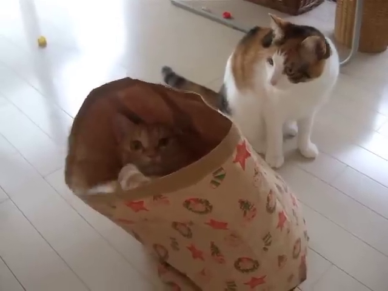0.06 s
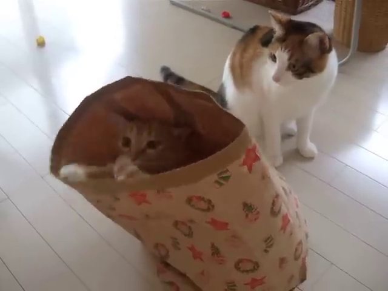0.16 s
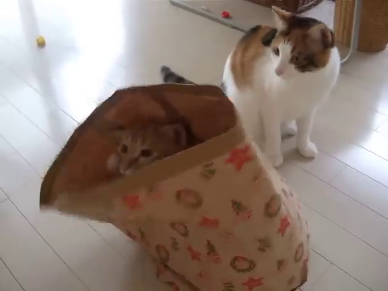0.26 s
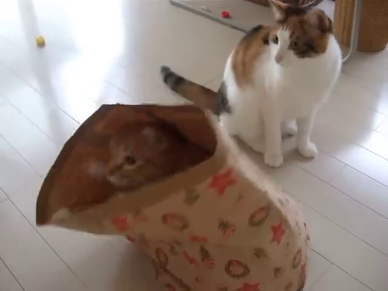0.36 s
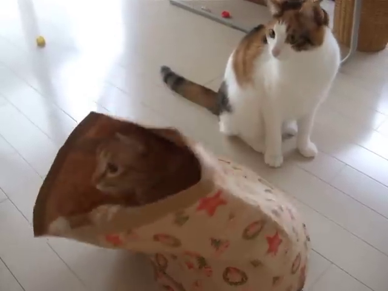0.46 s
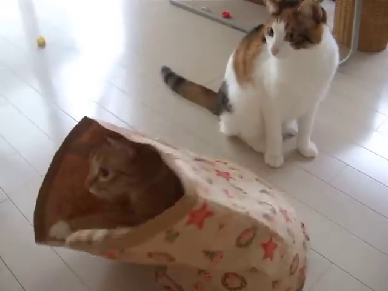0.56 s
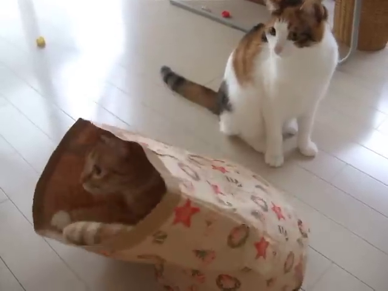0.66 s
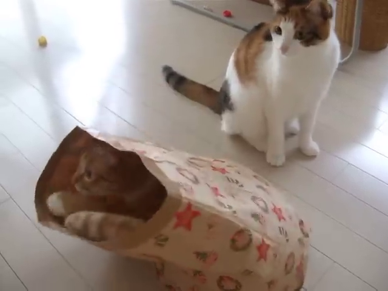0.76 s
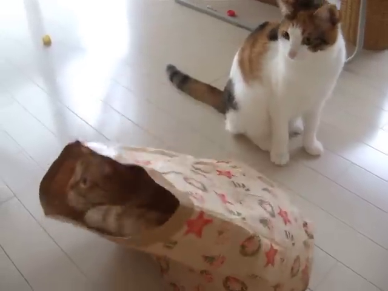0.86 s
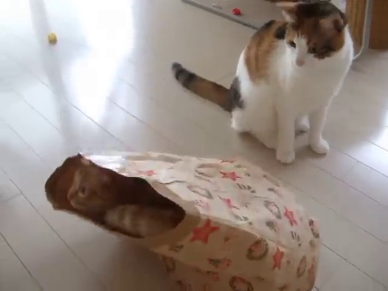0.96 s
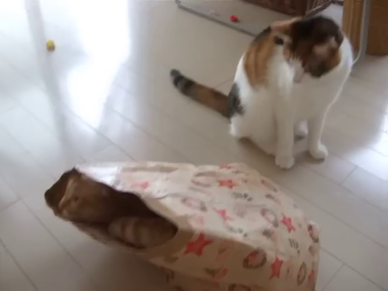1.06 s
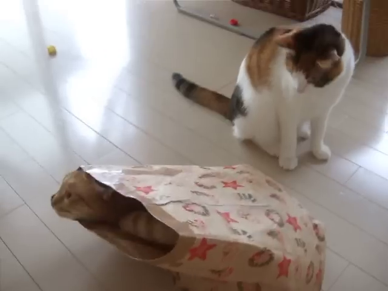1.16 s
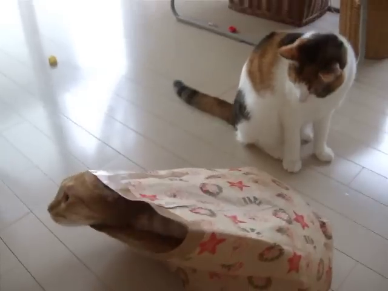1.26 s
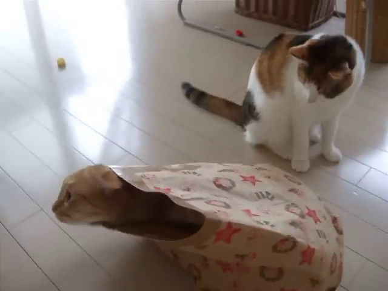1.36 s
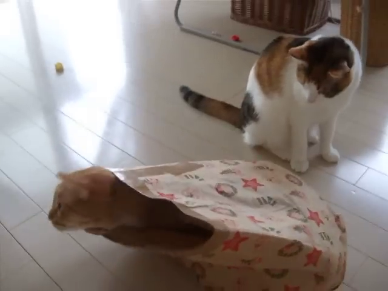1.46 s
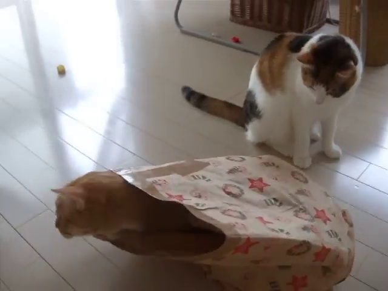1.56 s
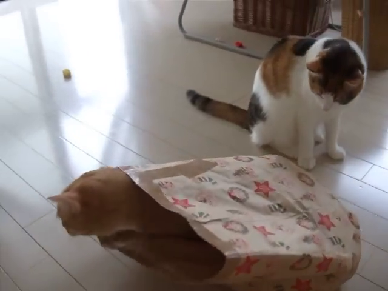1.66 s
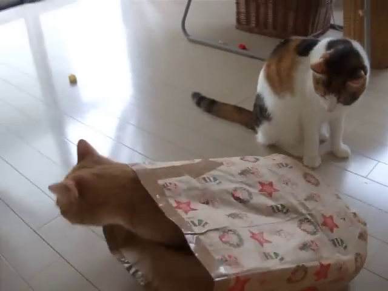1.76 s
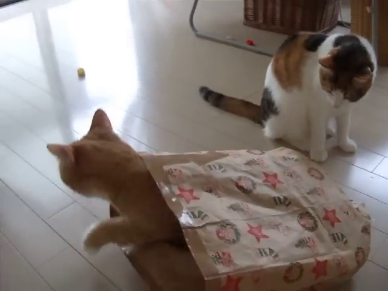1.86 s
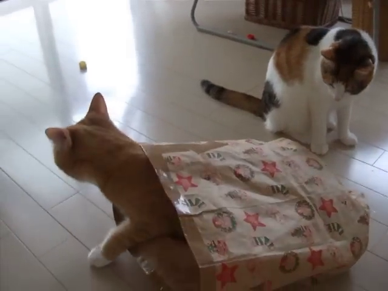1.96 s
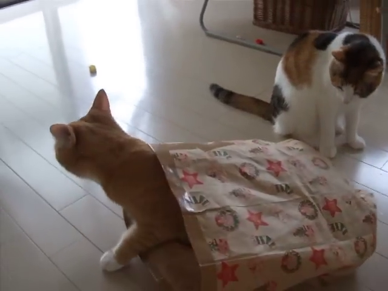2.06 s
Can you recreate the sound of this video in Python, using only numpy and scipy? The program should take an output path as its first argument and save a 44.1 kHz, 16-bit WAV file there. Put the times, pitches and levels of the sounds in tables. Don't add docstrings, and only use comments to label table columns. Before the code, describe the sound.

Paper bag rustling: brief near-quiet, then a sudden burst of hard crackles, sparser crumpling, and a second dense flurry as the cat climbs out onto a hard floor; short dull room echo, faint microphone hiss.

```python
import sys
import numpy as np
from scipy import signal
from scipy.fft import rfft, irfft
from scipy.io import wavfile

SR = 44100
rng = np.random.default_rng(int(sys.argv[2]) if len(sys.argv) > 2 else 0)


def elevation(decibels):
    levels = np.asarray(decibels, float)
    return 10 ** (levels / 20)


def pcm_store(signal):
    levels = np.round(np.clip(np.atleast_2d(signal), -1, 1) * 32767)
    wavfile.write(sys.argv[1], SR, levels.astype(np.int16).T)


N = 94815

# (frequency [Hz], level [dB per Hz])
HUSH_COLOUR = [(30, -13), (100, -8), (230, -9), (500, -14.5), (1250, -28), (8000, -11)]
# (frequency [Hz], level [dB per Hz])
SLIDE_COLOUR = [(1200, -12.5), (3000, -8), (7000, -3.5), (9000, 0)]
# (frequency [Hz], level [dB per Hz])
PAPER_COLOUR = [(160, -36.5), (400, -14), (850, 0.5), (1400, -9.5), (2500, -8), (4000, -17.5)]
# (time [s], wrinkling level [dB], sliding level [dB])
CAT_MOTION = [(0, -59, -75), (.065, -61.5, -85), (.08, -52, -42), (.2, -53, -40), (0.258, -37.5, -43.5),
              (0.451, -47, -37.5), (.6, -42.5, -43), (.78, -51, -37), (.9, -56, -42.5), (0.989, -49, -40.5),
              (1.09, -47, -40.5), (1.24, -39, -42), (1.38, -48, -34.5), (1.52, -48.5, -32),
              (1.721, -39.5, -44.5), (1.86, -43, -42), (2.0, -53, -48.5), (2.15, -53.5, -45.5)]
# (time [s], peak [dB], pitch [Hz])
FLOOR_THUDS = [(0.116, -54, 280), (0.286, -33, 290), (0.33, -27.5, 272), (0.421, -45, 298),
               (0.735, -43.5, 203), (1.187, -38, 380), (1.227, -29, 324), (1.628, -35.5, 283),
               (1.686, -29, 286), (1.73, -63.5, 312), (2.131, -42.5, 295), (0.25, -45, 112),
               (0.285, -41.5, 91), (0.408, -35, 338), (1.35, -50, 162), (1.73, -40.5, 120), (1.79, -43, 90),
               (1.815, -35, 320)]
# (time [s], peak [dB], pitch [Hz])
PANEL_POPS = [(0.143, -27, 770), (0.193, -28.5, 830), (0.221, -25.5, 880), (0.232, -20, 780),
              (0.247, -19, 770), (0.259, -20.5, 734), (0.288, -17, 785), (0.327, -12, 945),
              (0.365, -23.5, 618), (0.418, -26, 950), (0.434, -24.5, 960), (0.4475, -19.5, 990),
              (0.481, -21, 800), (0.506, -19.5, 880), (0.53, -43, 810), (0.548, -18, 894),
              (0.616, -26, 784), (0.658, -21.5, 970), (0.782, -26, 900), (0.929, -17, 800),
              (0.996, -19, 883), (1.029, -19.5, 884),
              (1.104, -16.5, 1015), (1.179, -17.5, 730), (1.187, -22, 690), (1.195, -11.5, 935),
                 (1.214, -18, 730), (1.2425, -13.5, 980), (1.259, -19, 870), (1.302, -12, 810),
                 (1.316, -17.5, 1040), (1.383, -22.5, 820), (1.392, -21, 1215), (1.478, -22, 890),
                 (1.497, -17, 1130), (1.562, -18, 1026), (1.583, -17, 900), (1.627, -18, 923),
                 (1.684, -13, 1010), (1.726, -23, 408), (1.81, -17.5, 1020), (1.818, -15, 940),
                 (1.847, -16, 1010), (1.969, -22, 960),
              (0.118, -36, 1094), (0.251, -15, 800), (.266, -25, 790), (.298, -17, 800),
                 (.331, -16.5, 780), (.341, -22.5, 950), (.459, -19.5, 980), (.535, -22, 805),
                 (.565, -33, 770), (0.684, -25.5, 945), (.7, -23.5, 1010), (.843, -24, 796),
                 (.912, -26.5, 904), (1.002, -20, 896), (1.009, -39, 900), (1.019, -32, 905),
                 (1.042, -32.5, 580), (1.108, -16, 940), (1.123, -19.5, 965), (1.251, -26.5, 397),
                 (1.231, -20.5, 940), (1.246, -16.5, 970), (1.267, -18.5, 830), (1.271, -30.5, 760),
                 (1.457, -37, 860), (1.598, -17, 905), (1.612, -27, 854), (1.688, -14, 864),
                 (1.696, -25, 980), (1.704, -21, 900), (1.738, -21.5, 815), (1.752, -21.5, 900),
                 (1.791, -20.5, 1020), (1.826, -35, 1000)]
# (time [s], peak [dB], low part [dB],
# high part [dB], fade [ms])
CREASE_SNAPS = [(0.0704, -38, -4.5, 3, 0.75), (0.219, -21, -18, -12.5, 6),
                (0.2338, -14.5, -14.5, -25, 7.7), (0.2476, -2.5, -8.5, -6, 1.07),
                (0.2564, -36, -21, -15.5, 1.2), (0.2834, 3.5, -25, -16, 2), (0.2936, -8.5, -25, -2, 2.3),
                (0.2959, -10, -19, -16, 1.4), (0.3249, -23.5, -1.5, -40.5, 3.8),
                (0.4164, -31, -5.5, -32, 1), (0.4594, -35, 1, -7, 1.1), (0.4816, -7, -15, -6, 1.9),
                (0.5209, -20, -3.5, 6.5, 1.6), (0.5464, -22.5, -9.5, -27, 4.6),
                (0.6203, -41.5, 10, 4, 0.88), (0.6571, -8.5, -19.5, -12, 1.76),
                (0.7001, -7, -23, -17, 2.8), (0.7274, -35, -5, -16, 0.67),
                (0.8425, -13.5, -11.5, -6.5, 2.6), (0.9084, -34.5, 5.5, -44, 2.5),
                (0.999, -8, -20.5, -9.5, 3.4),
                (1.1005, -34.5, -14, 6, 0.85), (1.1208, -13.5, -12.5, -11.5, 2),
                  (1.1782, -34, 7, -16, 2.7), (1.1827, -36.5, -13, 18, 0.83), (1.1889, -22, -7, 4, 2.5),
                  (1.217, -17.5, -22, -5, 1.9), (1.23, -19, -4, -5.5, 2.7), (1.2436, -14, -12.5, -2.5, 2.2),
                  (1.2603, -8, -17.5, -12.5, 2.3), (1.301, -18.5, -7.5, -28, 1.7),
                  (1.3164, -20, -3.5, 4.5, 1.4), (1.513, -24.5, -1, -25, 1.3),
                  (1.5615, -11, -38, -13.5, 3.9), (1.575, -23.5, -9, -27, 0.67), (1.5844, -24, 2, -25, 1.9),
                  (1.5966, 1, -29.5, -13, 1.2), (1.6277, -10, -7, -10.5, 1.7), (1.685, -18.5, 0.5, 6, 1.4),
                  (1.704, -12, -9, -12.5, 2), (1.7498, -12, -23.5, -28, 2.3),
                  (1.7787, -10.5, -20, -19.5, 4.2), (1.8088, -3, -34, -14.5, 2.2),
                  (1.8472, -21.5, 0, 5, 1.6), (1.9685, -25.5, -8.5, -5.5, 4.3),
                (0.5062, -23, -26, -4, 1.7),
    (0.5293, -29.5, -6, 0, 1.7),
    (1.6334, -34, -29, -25, 1.3),
    (1.816, -22, -2.5, -7, 0.64),
    (1.9376, -30, -13, -23, 2.3),
                (.252, -15, -15, -15, 1.6), (0.2584, -34, -20, -24.5, 3), (.275, -37, -17, -19, 3),
               (.307, -37, -30, -16, 2), (.353, -26, -8, -30, 2), (0.537, -20, -12, -16.5, 1.6),
               (1.107, -34, -13.5, -26, 2), (1.194, -27, -8.5, -28, 1.2), (1.66, -37, -14, -26, 1),
               (1.691, -19, -13, -30.5, 2.2), (1.718, -24.5, -22, -10, 1), (1.803, -26, -19, -18, 1),
               (1.818, -23, -3, -29, 1.5)]

HUSH_DB = -44.5
ROOM_T60_S, ROOM_DB, WALL_CUT_HZ = 0.26, -11, 4940
SLIDE_DB, SLIDE_FLICKER_DB = 2.5, 1.0
THUD_CYCLES, THUD_GAIN_DB, FLOOR_LOWEST_HZ = 10.5, 0.5, 55
WRINKLES_PER_S, WRINKLE_SPREAD_DB, CLUMP_DB = 2200, 1.5, 4.5
WRINKLE_CYCLES, WRINKLE_DB = 13.1, 3
POP_CYCLES, POP_GAIN_DB = 9.5, -3.5
FLUTTER_DB, FLUTTER_GRIT_DB, FLUTTER_MS = -13.5, 3.5, 3.57
SNAP_RISE_MS, SNAP_GRIT_DB, MID_PART_DB, SNAP_GAIN_DB = 0.28, 5, -16, 9
FLIP_AT_MS, FLIP_DB = 1.1, 9
BAG_LOWEST_HZ = 273


def rms_one(x):
    return x / np.sqrt(np.mean(x ** 2) + 1e-20)


def at_hz(points, hz):
    point_hz, point_db = np.transpose(points)
    return np.interp(np.log(hz), np.log(point_hz), point_db)


def drift(rate_hz):
    r = np.exp(-2 * np.pi * rate_hz / SR)
    wander = signal.lfilter([1], [1, -2 * r, r * r], rng.standard_normal(N + SR))
    return rms_one(wander[SR:])


def ring(clicks, hz, t60_s):
    r = elevation(-60 / (t60_s * SR))
    w = 2 * np.pi * hz / SR
    return signal.lfilter([0, np.sin(w)], [1, -2 * r * np.cos(w), r * r], clicks + 1e-18)


def band(x, low_hz, high_hz):
    return signal.sosfilt(signal.butter(2, [low_hz, high_hz], "band", fs=SR, output="sos"), x)


def coloured(spectrum):
    hz = np.maximum(np.fft.rfftfreq(N, 1 / SR), 1)
    return rms_one(irfft(rfft(rng.standard_normal(N)) * elevation(at_hz(spectrum, hz)), N))


def add(out, s, sound):
    i = int(s * SR)
    out[i:i + len(sound)] += sound[:len(out) - i]


def hush():
    return elevation(HUSH_DB) * coloured(HUSH_COLOUR)


def room(x):
    t = np.arange(SR // 2) / SR
    dull = np.exp(-2 * np.pi * WALL_CUT_HZ / SR)
    tail = signal.lfilter([1], [1, -dull], rng.standard_normal(len(t)))
    tail *= elevation(-60 * t / ROOM_T60_S)
    tail *= np.clip(t / 0.0076 - 0.3, 0, 1)
    return elevation(ROOM_DB) * signal.fftconvolve(x, tail / np.sqrt(np.sum(tail ** 2)))[:N]


def sliding_paper(level_db):
    flicker_db = SLIDE_FLICKER_DB * drift(8.1)
    return elevation(level_db + SLIDE_DB + flicker_db) * coloured(SLIDE_COLOUR)


def knocks(rows, cycles, gain_db):
    out = np.zeros(N)
    ms = np.arange(4000) / SR * 1000
    for s, db, hz in rows:
        chance, grit = rng.standard_normal((2, len(ms)))
        width = int(SR / hz / 2)
        flutter = chance * elevation(FLUTTER_GRIT_DB * (grit + 1)) * np.exp(-ms / FLUTTER_MS)
        push = elevation(FLUTTER_DB) * np.sqrt(width) * flutter
        push[:width] += np.hanning(width) * np.sign(chance[0])
        soft_push = signal.lfilter([1], [1, -np.exp(-4 * np.pi * hz / SR)], push)
        body = ring(soft_push, hz, cycles / hz)
        add(out, s, elevation(db + gain_db) * body / np.abs(body).max())
    return out


def floor_thuds():
    return band(knocks(FLOOR_THUDS, THUD_CYCLES, THUD_GAIN_DB), FLOOR_LOWEST_HZ, 5000)


def wrinkles(level_db):
    sizes = elevation(WRINKLE_SPREAD_DB * np.minimum(rng.exponential(1, N), 3))
    sizes *= rng.choice([-1, 1], N)
    born = rng.random(N) < WRINKLES_PER_S * elevation(CLUMP_DB * drift(40)) / SR
    pitches = np.geomspace(160, 4000, 24)
    dealt = rng.integers(0, 24, N)
    rustle = np.zeros(N)
    for k, hz in enumerate(pitches):
        clicks = sizes * born * (dealt == k)
        rustle += elevation(at_hz(PAPER_COLOUR, hz)) * hz * ring(clicks, hz, WRINKLE_CYCLES / hz)
    return elevation(level_db + WRINKLE_DB) * rms_one(rustle)


def panel_pops():
    return knocks(PANEL_POPS, POP_CYCLES, POP_GAIN_DB)


def crease_snaps():
    out = np.zeros(N)
    ms = np.arange(1000) / SR * 1000
    rise = 1 - np.exp(-(ms / SNAP_RISE_MS) ** 2)
    for s, db, low_db, high_db, fade_ms in CREASE_SNAPS:
        slip, grit = rng.standard_normal((2, len(ms)))
        burst = slip * elevation(SNAP_GRIT_DB * grit) * rise * np.exp(-ms / fade_ms)
        burst[int(FLIP_AT_MS * SR / 1000)] += elevation(FLIP_DB) * np.sign(slip[0])
        # (signed share, level [dB], from [Hz], to [Hz])
        parts = ((0.89, low_db, 1270, 3210),
                 (-0.54, MID_PART_DB, 3060, 5460),
                 (0.83, high_db, 5740, 11440))
        for share, part_db, low_hz, high_hz in parts:
            part = band(burst, low_hz, high_hz)
            add(out, s, elevation(db + part_db + SNAP_GAIN_DB) * share * part / np.abs(part).max())
    return out


def scene():
    s, wrinkle_db, slide_db = np.transpose(CAT_MOTION)
    t = np.arange(N) / SR
    paper = crease_snaps() + panel_pops() + wrinkles(np.interp(t, s, wrinkle_db))
    bag = band(paper, BAG_LOWEST_HZ, 20000) + floor_thuds()
    slide = sliding_paper(np.interp(t, s, slide_db))
    return (bag + room(bag) + slide + hush())[None]


def roll_off(x):
    return signal.sosfilt(signal.butter(12, 9310, fs=SR, output="sos"), x)


def record(dry):
    cut = signal.sosfilt(signal.cheby2(12, 70, 9350, fs=SR, output="sos"), dry)
    return roll_off(cut - 0.0024)


dry = scene()
out = record(dry)
pcm_store(out)
```